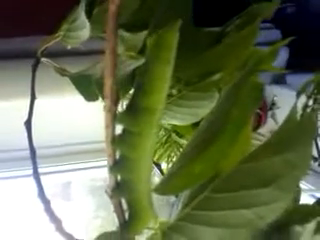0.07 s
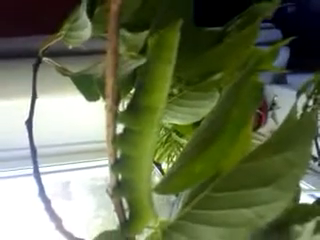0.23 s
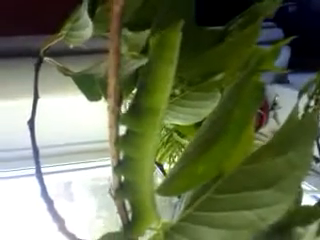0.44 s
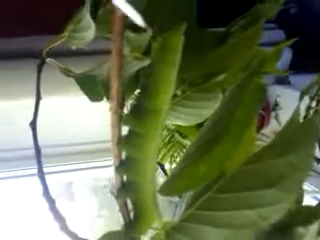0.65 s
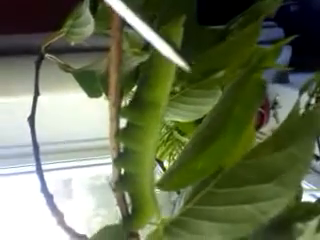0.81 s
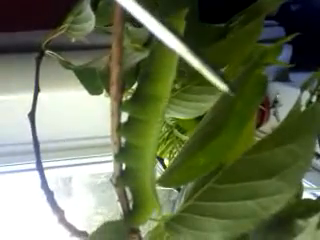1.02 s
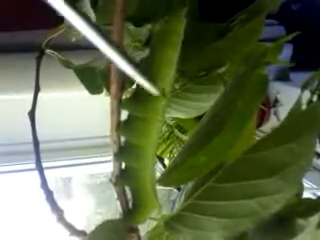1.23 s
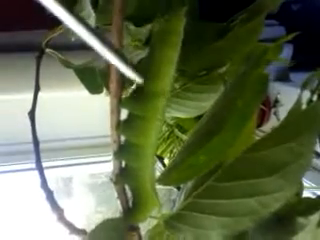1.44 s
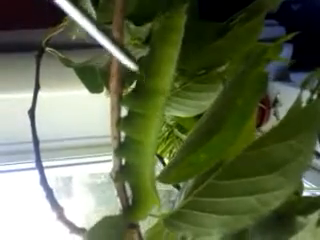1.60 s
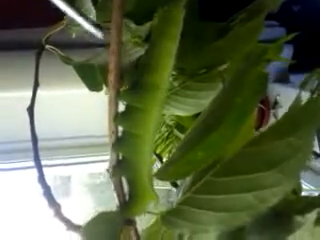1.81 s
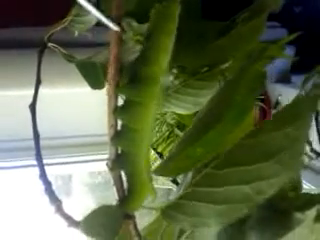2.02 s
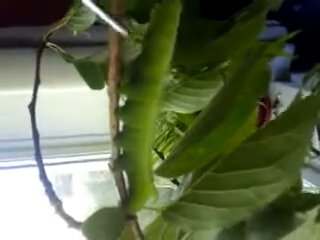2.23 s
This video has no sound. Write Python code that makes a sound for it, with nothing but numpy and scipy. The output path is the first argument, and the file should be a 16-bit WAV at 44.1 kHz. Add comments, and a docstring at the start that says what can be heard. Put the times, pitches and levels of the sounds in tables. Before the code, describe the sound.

One loud electrical click, followed by light taps of a stick in a quiet room.

```python
"""A caterpillar on a leafy twig is poked with a thin stick in a quiet room.
Hiss and a wavering low hum, as of a distant motor, run underneath. At 0.2 s a voltage pulse makes
one sharp electrical click and the room drops out for an instant. Leaves rustle faintly.
From 0.7 s come dry ticks, near 2 s more ticks and a light scrape, probably stick on twig and leaf."""
import sys
import numpy as np
from scipy import signal
from scipy.fft import rfft, irfft
from scipy.io import wavfile
from scipy.ndimage import uniform_filter1d

SR = 44100
rng = np.random.default_rng(int(sys.argv[2]) if len(sys.argv) > 2 else 0)


def unload_audio(sound):
    """Save the sound as a 16-bit wav file, at the path given as the first command line argument."""
    columns = np.transpose(np.atleast_2d(sound))
    # keep every value between -1 and 1, then stretch to whole-number steps
    steps = np.round(np.clip(columns, -1, 1) * 32767)
    wavfile.write(sys.argv[1], SR, steps.astype(np.int16))


N = 103635


def undb(db):
    """dB to gain."""
    return 10 ** (np.asarray(db) / 20)


def unit(x):
    """Scale to rms 1."""
    return x / np.sqrt(np.mean(x ** 2) + 1e-20)


def curve(rows):
    """Linear interpolation of time_s, value rows."""
    return np.interp(np.arange(N) / SR, *np.array(rows).T)


def colour(x, spectrum):
    """Filter by freq_hz, gain_db rows; rms 1."""
    hz, db = np.array(spectrum).T
    bin_hz = np.maximum(np.fft.rfftfreq(N, 1 / SR), 1)
    gain = undb(np.interp(np.log(bin_hz), np.log(hz), db))
    return unit(irfft(rfft(x - x.mean()) * gain, N))


def lowpass(x, cutoff_hz, order):
    """Zero-phase low-pass."""
    bin_hz = np.fft.rfftfreq(N, 1 / SR)
    return irfft(rfft(x) / np.sqrt(1 + (bin_hz / cutoff_hz) ** (2 * order)), N)


def wander(rate_per_s):
    """Smoothed random steps; rms 1."""
    hold = max(int(SR / rate_per_s), 2)
    steps = rng.standard_normal(200)[np.arange(N) // hold % 200]
    return unit(uniform_filter1d(uniform_filter1d(steps, hold), hold))


def hiss(level_db=-63.5, wander_db=1.5):
    """Room and microphone noise: steady treble, wandering bass."""
    # freq_hz, gain_db
    spectrum = [(10, 0.5), (30, -3), (100, -3), (250, -2.5), (400, -6), (700, -8.5), (1000, -9),
                (1500, -13.5), (2400, -13.5), (3500, -15.5), (5000, -18.5), (7000, -19)]
    noise = undb(level_db) * colour(rng.standard_normal(N), spectrum)
    bass = lowpass(noise, cutoff_hz=90, order=3)
    bass_gain = undb(wander_db * wander(rate_per_s=15))
    return noise + bass * (bass_gain - 1)


def hum_partial(pitch_hz, level_db, waver_db, drift=0.01415, rate_per_s=19):
    """One tone, wavering in pitch and level."""
    phase = 2 * np.pi * np.cumsum(pitch_hz * (1 + drift * wander(rate_per_s))) / SR
    return undb(level_db + waver_db * wander(rate_per_s)) * np.sqrt(2) * np.sin(phase)


def hum():
    """Low hum, as of a distant motor: three partials swell in turn over three faint ones."""
    # time_s, low_db, middle_db, high_db
    swells = [(0, -70, -72.5, -74), (0.399, -79.5, -75.5, -83), (.56, -69.5, -73, -88),
              (.7, -74.5, -77.5, -76.5), (.87, -80, -66, -82), (1.04, -70, -63.5, -82),
              (1.22, -77, -76, -85), (1.32, -72, -76.5, -80), (1.45, -72.5, -73, -66.5),
              (1.53, -75, -64.5, -73), (1.7, -87, -73, -75), (1.83, -79.5, -67.5, -74),
              (1.95, -81.5, -77.5, -72), (2.09, -79, -73, -68), (2.2, -80, -80.5, -78),
              (2.35, -89, -76, -78)]
    # pitch_hz, level_db, waver_db
    faint_partials = [(54, -76.5, 3), (105.7, -78, 3), (492, -85, 3.5)]
    strong = sum(hum_partial(pitch_hz, curve(np.array(swells)[:, [0, column]]), waver_db=2)
                 for column, pitch_hz in enumerate((162, 225.7, 282), start=1))
    return strong + sum(hum_partial(*row) for row in faint_partials)


def dropout(t, start_s=0.184, end_s=0.247, edge_s=0.0091):
    """Gain that falls to zero around the click."""
    return np.clip(np.maximum(start_s - t, t - end_s) / edge_s + 0.5, 0, 1)


def click(t, centre_s=0.20057):
    """Rectangular voltage step down and back, inside a brief fizz."""
    # freq_hz, gain_db
    fizz_spectrum = [(30, 2), (500, -2.5), (1500, -3.5), (3000, -9), (7000, -9.5)]
    pulse_db, width_ms, edge_ms = -3, 0.372, 0.051
    fizz_db, lag_s, spread_s = -37.5, 0.00046, 0.0068
    offset_ms = 1000 * abs(t - centre_s)
    pulse = np.clip((width_ms / 2 - offset_ms) / edge_ms + 0.5, 0, 1)
    envelope = np.exp(-((t - centre_s - lag_s) / spread_s) ** 4)
    fizz = envelope * colour(rng.standard_normal(N), fizz_spectrum)
    return undb(fizz_db) * fizz - undb(pulse_db) * pulse


def friction(levels, spectrum, slips_per_s=2200):
    """Dense tiny slips between sliding surfaces."""
    slips = (rng.random(N) < slips_per_s / SR) * rng.standard_normal(N)
    return undb(curve(levels)) * colour(slips, spectrum)


def leaf_rustle():
    """Leaves sliding: faint, high friction noise."""
    # time_s, level_db
    levels = [(.25, -88), (.3, -77), (.35, -74), (.42, -70.5), (.49, -82), (.55, -97)]
    # freq_hz, gain_db
    spectrum = [(3000, -26.5), (3900, -8.5), (4300, -2), (4700, -7.5), (6000, -15)]
    return friction(levels, spectrum)


def mode(age_s, freq_hz, gain_db, t60_s):
    """One decaying resonance."""
    return undb(gain_db) * np.exp(-np.log(1000) * age_s / t60_s) * np.sin(2 * np.pi * freq_hz * age_s)


def ticks(t, width_octaves=0.5, attack_s=0.00026, room_db=-9, room_t60_s=0.087):
    """Each contact rings wood modes near its pitch and bends the twig with a thud; short room tail."""
    # start_s, level_db, pitch_hz, thud_relative_db
    contacts = [(0.6913, -41.5, 2200, -9), (0.6925, -37, 3360, -22), (0.7988, -61, 990, -5),
                (2.0335, -34, 2630, -19), (2.0359, -42.5, 1440, -27), (2.118, -45, 2680, -27),
                (2.3354, -50, 2800, -23)]
    # stick and twig ringing: freq_hz, gain_db, t60_s
    wood_modes = [(1480, -6.5, 0.012), (2000, -4.5, 0.015), (2350, -0.5, 0.013), (2640, 6.5, 0.0083),
                  (3026, -2, 0.013), (3424, 5.5, 0.0071)]
    # twig bending: freq_hz, gain_db, t60_s
    bending_modes = [(323, -2.5, .025), (635, -6, 0.015), (1110, 0, .02)]
    direct = np.zeros(N)
    for start_s, level_db, pitch_hz, thud_relative_db in contacts:
        age_s = np.maximum(t - start_s, 0)
        ring = np.zeros(N)
        for freq_hz, gain_db, t60_s in wood_modes:
            detuning = np.log2(freq_hz / pitch_hz) / width_octaves
            ring += mode(age_s, freq_hz, gain_db, t60_s) / (1 + detuning ** 2) ** 2
        ring *= 1 - np.exp(-age_s / attack_s)
        thud = sum(mode(age_s, *row) for row in bending_modes)
        direct += undb(level_db) * (ring / abs(ring).max() + undb(thud_relative_db) * thud)
    tail = rng.standard_normal(N) * np.exp(-np.log(1000) * t / room_t60_s)
    room = signal.fftconvolve(direct, tail / np.linalg.norm(tail))[:N]
    return lowpass(direct + undb(room_db) * room, cutoff_hz=3880, order=12)


def stick_scrape():
    """Stick sliding lightly over leaves."""
    # time_s, level_db
    levels = [(1.95, -90), (2.04, -84), (2.095, -67.5), (2.125, -61), (2.15, -72.5), (2.2, -69.5),
              (2.295, -70.5), (2.315, -62.5), (2.35, -62)]
    # freq_hz, gain_db
    spectrum = [(500, -31), (1500, 2.5), (2300, 5), (2900, 8), (3800, -15), (6000, -22.5)]
    return friction(levels, spectrum)


def scene():
    """Mono mix; the dropout mutes all but the click."""
    t = np.arange(N) / SR
    plant = ticks(t) + stick_scrape() + leaf_rustle()
    return (dropout(t) * (hiss() + hum() + plant) + click(t))[None]


def record(dry):
    """Narrow-band recorder: clips the click's peak, softens the top treble."""
    clip_level = 0.712
    narrow = lowpass(dry[0], cutoff_hz=7080, order=80)
    clipped = np.clip(narrow, -clip_level, clip_level)
    softened = lowpass(clipped, cutoff_hz=10900, order=4)
    return lowpass(softened, cutoff_hz=15800, order=60)[None]


dry = scene()
out = record(dry)
unload_audio(out)
```